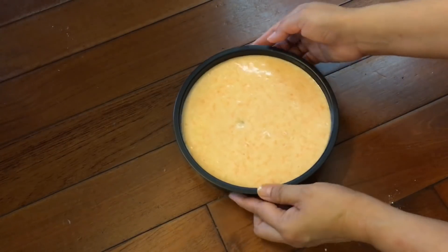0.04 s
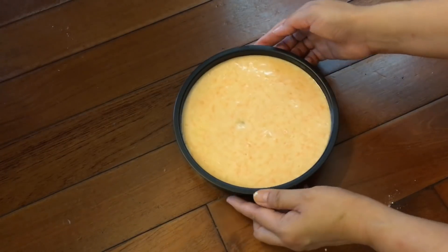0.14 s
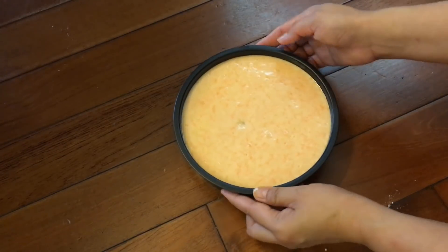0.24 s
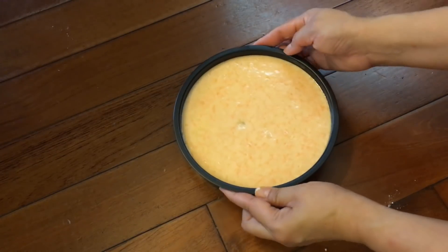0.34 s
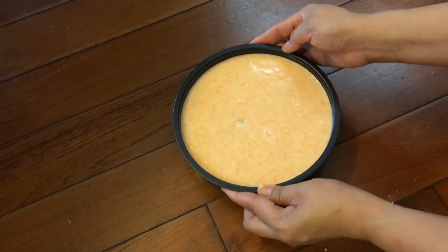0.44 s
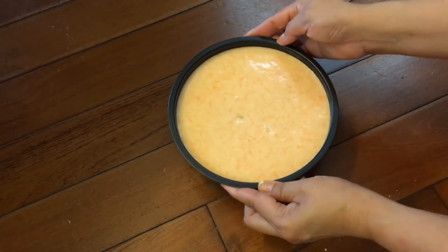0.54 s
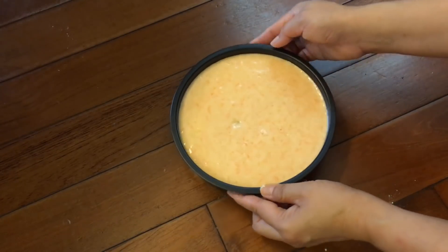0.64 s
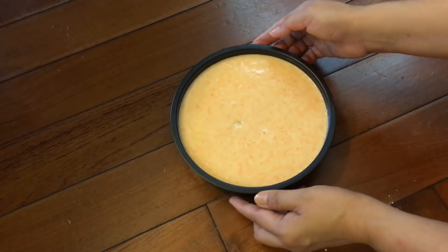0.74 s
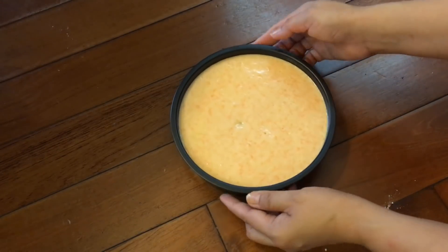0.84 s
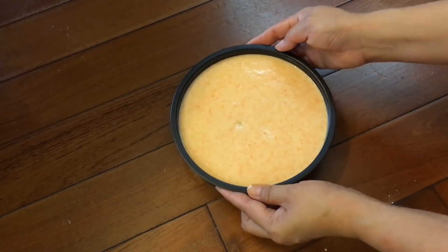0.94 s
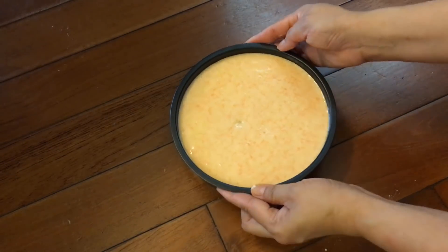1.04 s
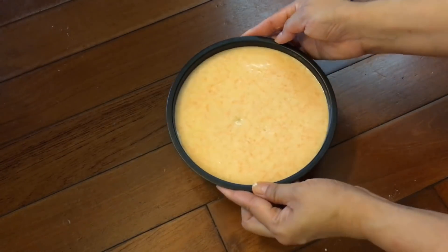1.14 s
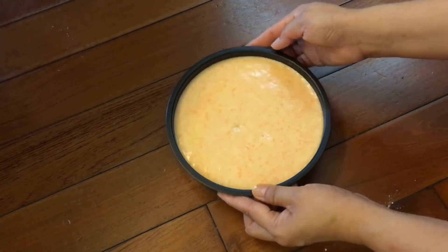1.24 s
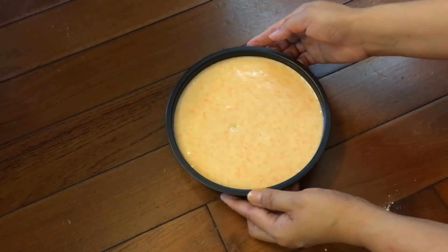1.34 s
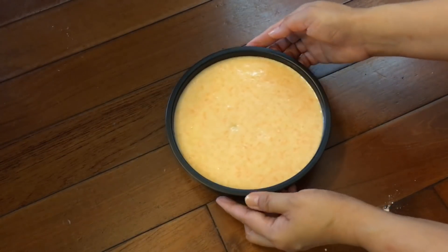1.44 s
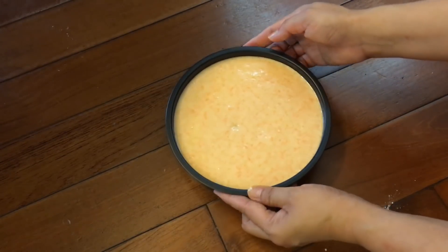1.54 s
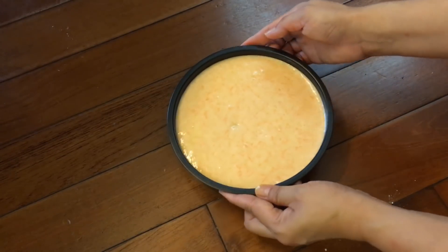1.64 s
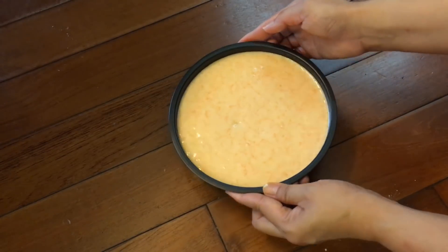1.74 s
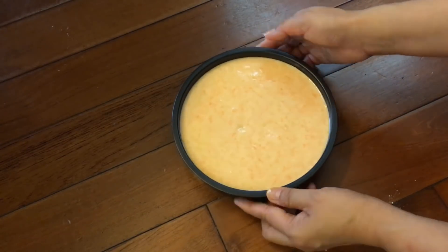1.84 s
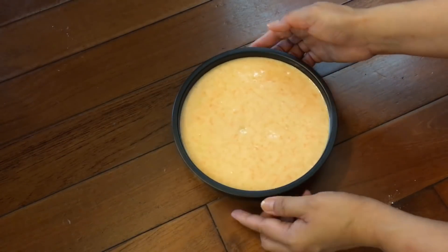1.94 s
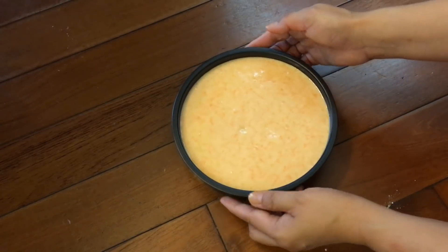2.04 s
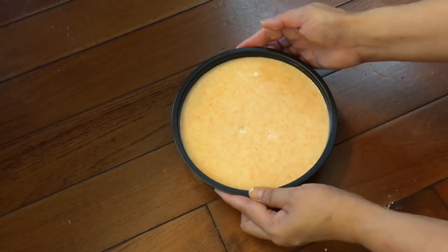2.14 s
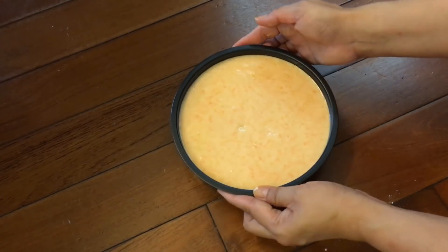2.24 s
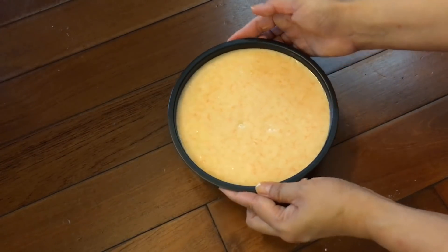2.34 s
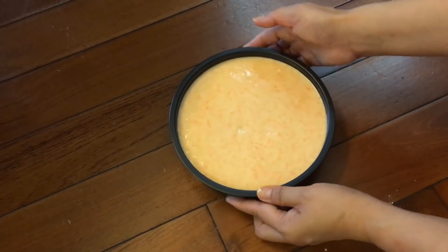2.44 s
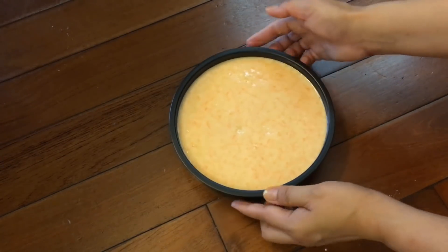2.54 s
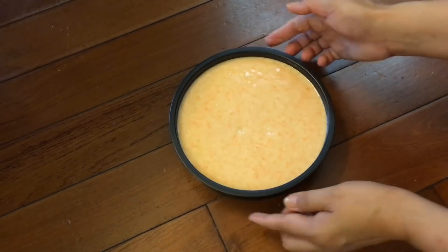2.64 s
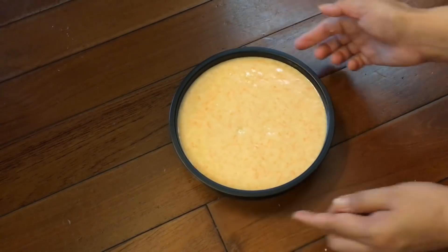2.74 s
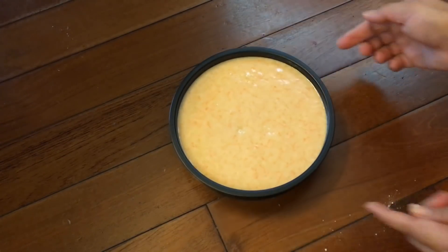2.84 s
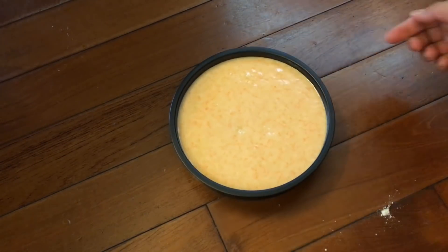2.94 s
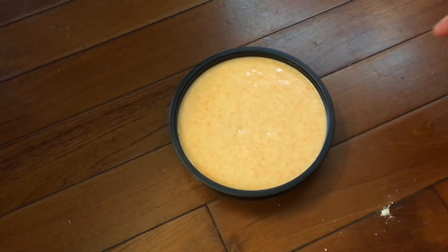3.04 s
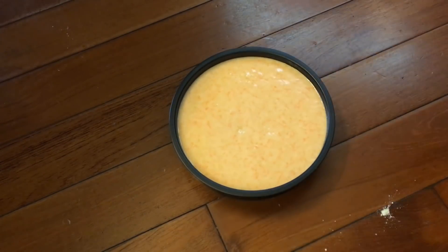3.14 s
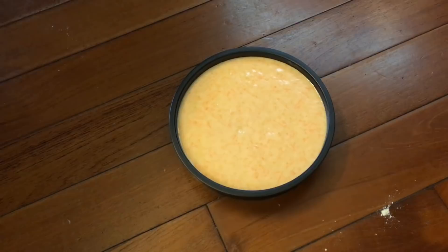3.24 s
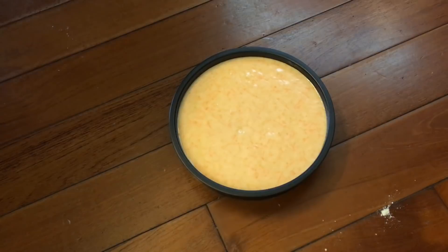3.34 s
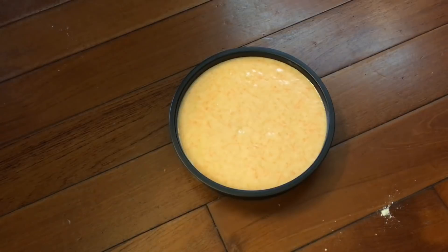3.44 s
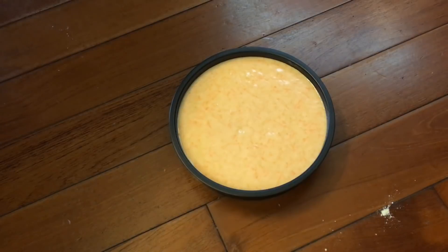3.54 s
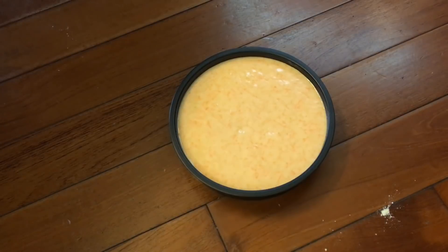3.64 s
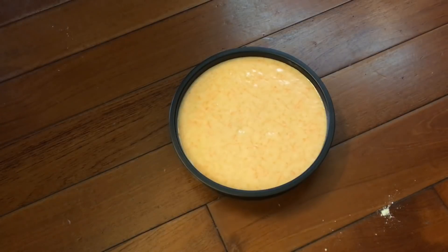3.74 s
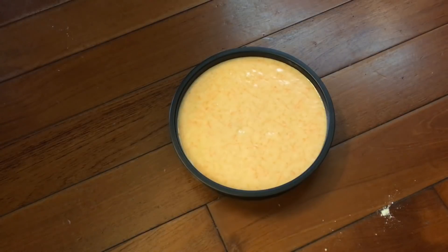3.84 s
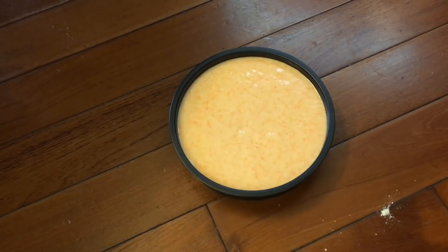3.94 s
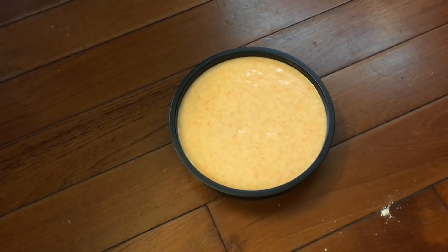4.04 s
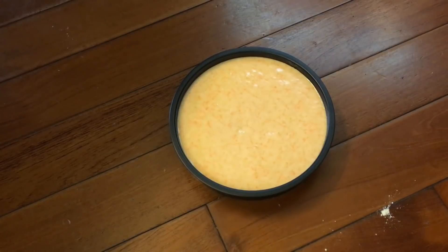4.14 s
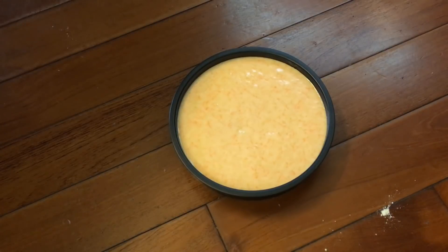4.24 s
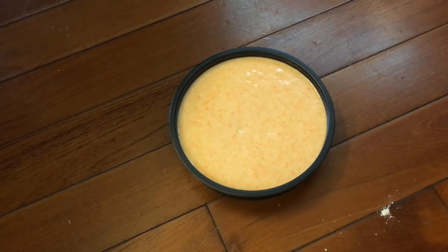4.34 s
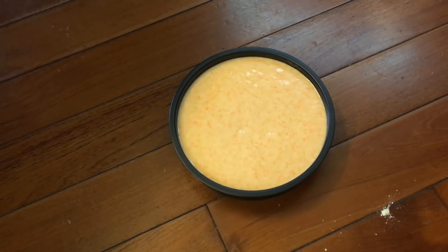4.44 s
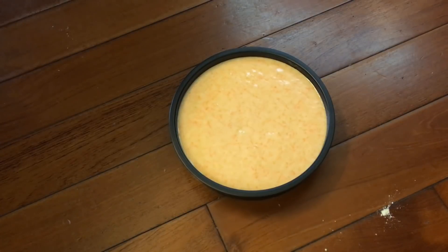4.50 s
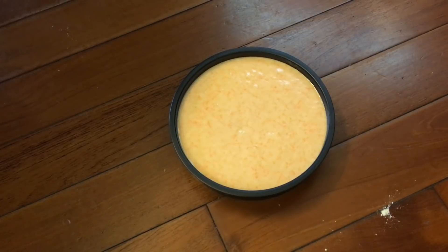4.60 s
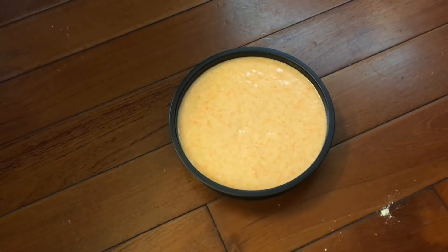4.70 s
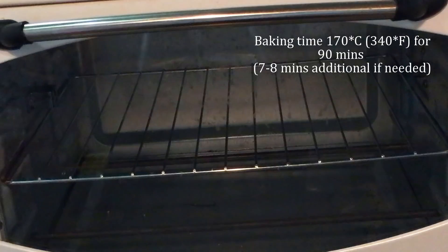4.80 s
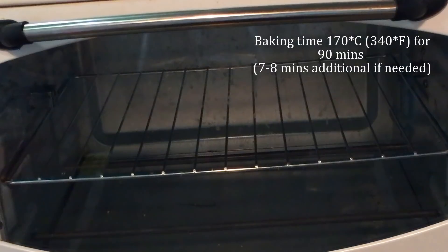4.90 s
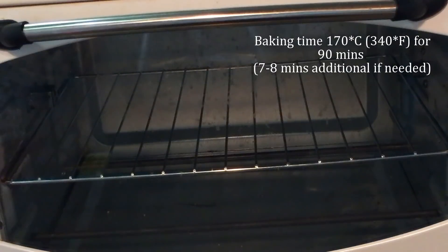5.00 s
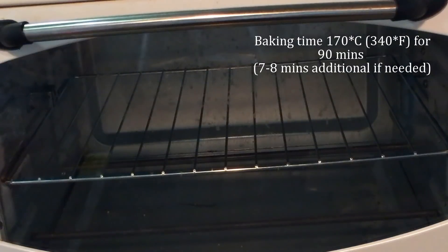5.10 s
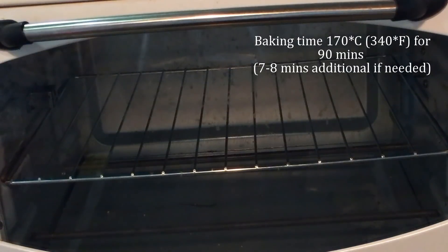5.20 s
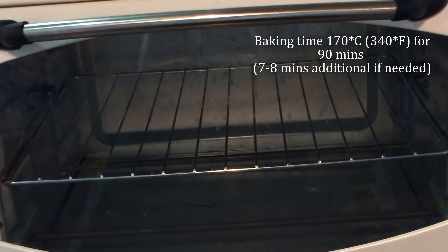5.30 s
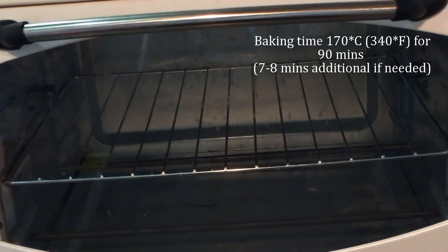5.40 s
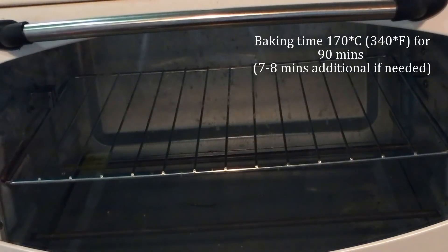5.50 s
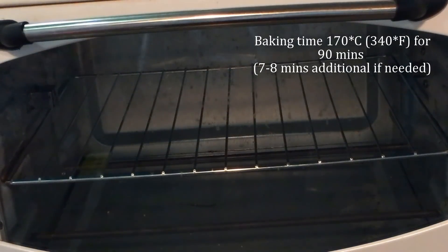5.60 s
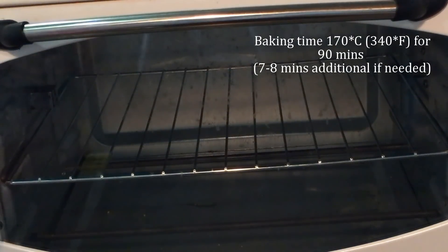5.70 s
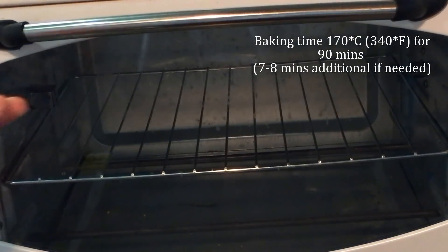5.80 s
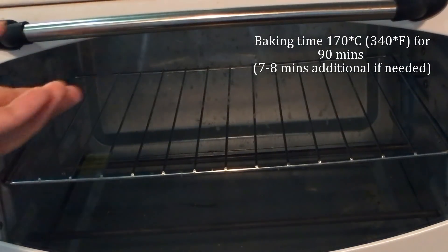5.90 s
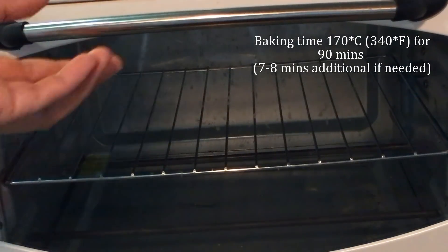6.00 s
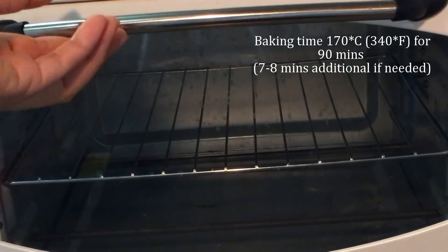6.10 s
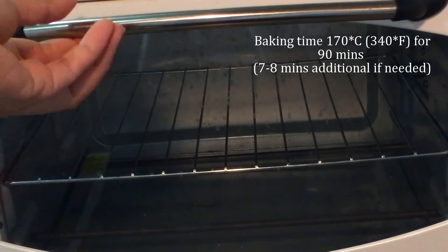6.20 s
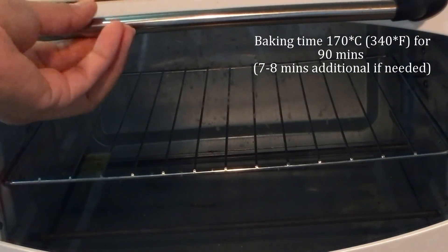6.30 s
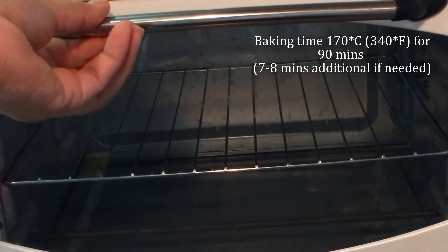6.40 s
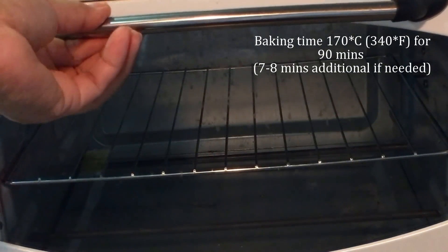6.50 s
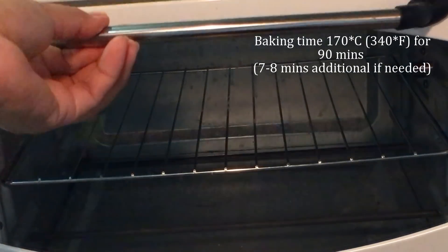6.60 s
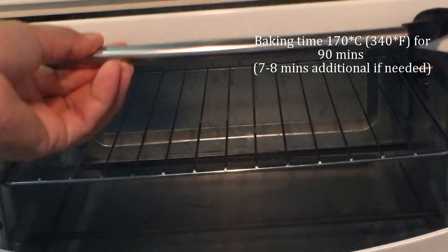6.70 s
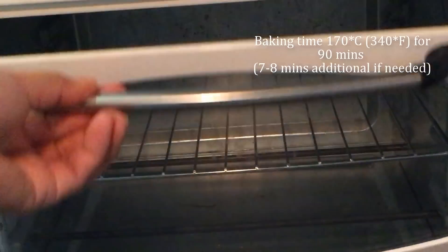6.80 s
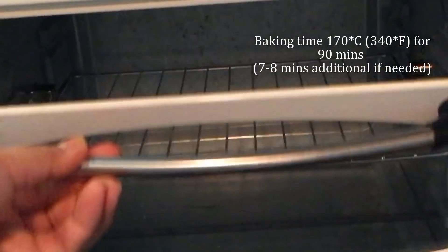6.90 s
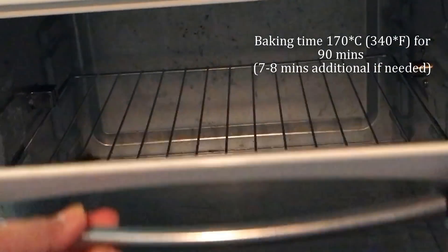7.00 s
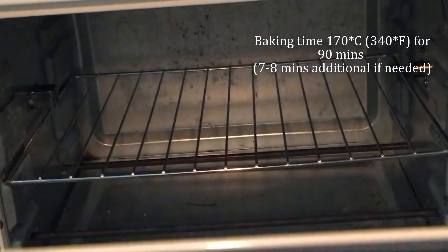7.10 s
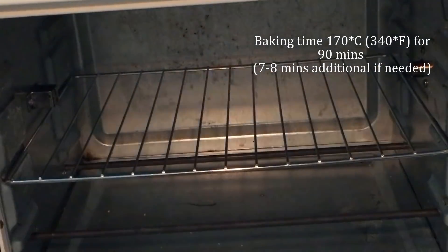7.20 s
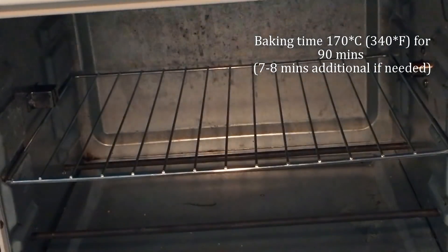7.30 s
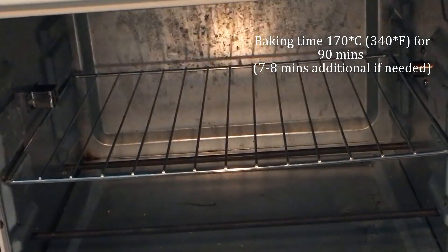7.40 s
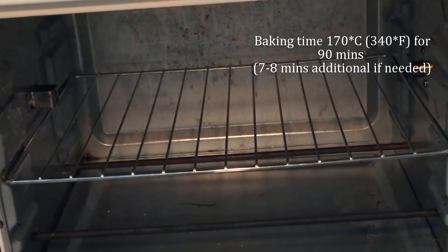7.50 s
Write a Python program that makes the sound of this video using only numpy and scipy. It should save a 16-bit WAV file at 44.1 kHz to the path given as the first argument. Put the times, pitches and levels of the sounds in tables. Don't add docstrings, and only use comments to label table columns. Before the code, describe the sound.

Five heavy knocks of a damped metal pan on floorboards, the second softer and duller, the last hardest, with short indoor reverb and a close microphone that flattens the peaks. Soft rustles and floor rumble fade into near quiet. The sound cuts abruptly to a hissier oven: a small bright wire clink, five tiny ticks, a metallic unlatching scrape, a bouncing door thud, and low hinge grinding to the end.

```python
import sys
import numpy as np
from scipy import signal
from scipy.fft import irfft
from scipy.io import wavfile
from scipy.ndimage import uniform_filter1d, map_coordinates

SR = 44100
rng = np.random.default_rng(int(sys.argv[2]) if len(sys.argv) > 2 else 0)


def rack_gain(trim_db):
    fader = np.asarray(trim_db, float)
    return 10 ** (fader / 20)


def dump_mix(stems):
    frames = np.atleast_2d(stems).T
    limited = np.clip(frames, -1, 1)
    pcm = np.round(limited * 32767).astype(np.int16)
    wavfile.write(sys.argv[1], SR, pcm)


N = 332955
STEP = 8
T = np.arange(0, N + STEP, STEP) / SR
EDGES_HZ = np.geomspace(28, 15700, 29)
BAND_HZ = np.sqrt(EDGES_HZ[1:] * EDGES_HZ[:-1])
KITCHEN_ENDS_S, OVEN_STARTS_S = 4.830, 4.876

# start in seconds, blow in dB, contact in Hz, hoop ring in dB.
RIM = [
    (0.1088, 4, 1170, -11),
    (0.7446, 1.5, 767, -6.5),
    (1.3555, 4, 1146, -15),
    (1.9112, 0.5, 912, -19.5),
    (2.5298, 5.5, 1200, -9.5),
]
# start in seconds, blow in dB, contact in Hz, favoured board pitch in Hz,
# fall-off in dB one octave away.
BASE = [
    (0.1169, 2.5, 740, 200, 7.5),
    (0.7483, -8, 568.4, 268, 34),
    (1.3668, 2, 739, 221.2, 6),
    (1.9196, -1, 727, 318.7, 2.5),
    (2.5358, 2.5, 804.4, 198.6, 1),
]
# start in seconds, level in dB, brightness in dB per octave,
# decay stretch as a ratio, bass in dB.
ROOM_ANSWERS = [
    (.112, -7, 0.5, 0.98, 1.5),
    (.747, -8.5, -2.5, 0.95, -11.5),
    (1.358, -9, 1.1, 1.094, 2),
    (1.912, -10.5, -1.5, 0.86, -2.5),
    (2.534, -10, 2.5, 1.168, 1),
]
# rim crack in dB, base crack in dB, brightness in dB per octave, joist boom in dB.
CONTACT = [
    (0, 2, -1.5, -3.5),
    (-2.5, 4, -1, 6.5),
    (2, 0, 0.5, 2.5),
    (1, -7.5, 1, -1.5),
    (2, -2.5, -0.5, -1),
]
# pitch in Hz, level in dB, t60 in seconds.
PAN_MODES = [(677, -2.5, 0.045), (920, -5.5, 0.043), (1080, -7, 0.051), (1500, -5.5, 0.06),
             (2240, -24, 0.06), (2920, -18, 0.035), (5000, -26.5, .012)]
# pitch in Hz, level in dB, t60 in seconds.
HOOP_MODES = [(262, -1.3, 0.12)]
# pitch in Hz, level in dB, t60 in seconds.
BOARD_MODES = [(63, -6.5, .3), (95, -1.5, 0.38), (165.94, -3, 0.074), (200, -6.5, 0.032),
               (259.8, -5, 0.066), (336, -1.5, 0.094), (455, -5, 0.1)]
# frequency in Hz, level in dB per Hz.
ROOM = [(24, -41), (40, -11.5), (140, 0), (180, -13), (256, -3.5), (283, -8), (516, -16.5), (600, -10),
        (810, -11), (918, -12), (990, -13), (4240, -36), (16000, -63)]
# frequency in Hz, t60 in seconds.
ROOM_T60 = [(60, 0.35), (160, 0.29), (420, .27), (1100, .29), (2200, 0.36), (3300, 0.3), (4300, 0.21),
            (6000, 0.23), (12000, .14)]
# frequency in Hz, level in dB per Hz.
NEXT_ROOM = [(300, -11), (900, 2), (2000, 1.5), (3200, -16.5), (4500, -25)]
# frequency in Hz, level in dB per Hz.
CRACK = [(880, -26.5), (1500, 1), (2720, -11.5), (3030, -9), (4120, -15), (12500, -30), (16000, -44)]

# start in seconds, level in dB.
RACK_HITS = [
    (5.0244, -29.5),
    (5.027, -46),
    (5.0299, -37),
    (5.036, -55),
]
RACK_HZ = [939, 1064, 1681, 1728, 2015, 3106, 3310, 3693, 4066, 4204, 4323, 5376, 6573, 8395, 9103, 9722,
           10050, 10350, 15610]
# level in dB, t60 in seconds.
RACK_RINGS = [(-20, 0.25), (-25, 0.18), (-32, 0.39), (-31, 0.4), (-17.5, .1), (-23.5, 0.2), (-27, 0.12),
              (-34, .08), (-24, .1), (-13, 0.078), (-12, 0.055), (-4, 0.3), (-11.5, .06), (-7.5, 0.11),
              (-10, 0.044), (-2, .06), (-5, 0.027), (-13, 0.047), (-8, .1)]
# start in seconds, level in dB, centre in Hz.
TICKS = [
    (5.2833, -55.5, 4350),
    (5.546, -50.5, 7320),
    (5.812, -56.5, 6024),
    (6.077, -51.5, 6500),
    (6.341, -51.5, 6500),
]
# pitch in Hz, rms level in dB.
WHINE = [(14244, -105), (14293, -109), (14346, -75), (14395, -83), (14492, -111)]
# start in seconds, level in dB.
STOP_HITS = [
    (6.924, -27),
    (6.939, -21.5),
    (6.946, -18.5),
    (6.997, -30),
    (7.049, -34),
    (7.08, -37.5),
]
# pitch in Hz, level in dB, t60 in seconds.
DOOR_MODES = [(103, -21, 0.29), (161, -14, 0.26), (220.7, 2.5, 0.17), (245, -14, 0.21), (344.7, -6.5, 0.35),
              (421, -10.5, 0.086), (488.7, -2.5, 0.12)]
# time in seconds, level in dB.
UNLATCH = [
    (6.42, -77.5),
    (6.5, -69),
    (6.564, -71),
    (6.62, -55),
    (6.66, -53),
    (6.72, -54),
    (6.78, -60),
    (6.85, -57),
    (6.91, -57),
]
# time in seconds, level in dB.
LOWER = [
    (6.96, -38.5),
    (7.04, -53),
    (7.16, -46.5),
    (7.2, -49.5),
    (7.3, -49),
    (7.366, -45),
    (7.458, -48.5),
    (7.55, -52.5),
]
# panel, hinge, scrape and grit, in dB relative to the friction.
UNLATCH_MIX_DB = (2, 4.5, -5, -5.5)
LOWER_MIX_DB = (4, -1, -9, -18)
# frequency in Hz, level in dB per Hz.
PANEL = [(29, -38.5), (50, -6.5), (134, 3), (172, -7.5), (250, -3.5), (364, -12), (482, -14), (600, -20),
         (780, -44.5), (1320, -120)]
HINGE = [(240, -33.5), (400, -21), (503, 2), (615, 5.5), (710, 4), (850, -1.5), (1280, 10.5), (1900, -17),
         (2470, -42.5), (4180, -120)]
SCRAPE = [(1000, -28), (1700, -2), (2760, -9.5), (3000, -13.5), (3300, 0), (4290, -44.5), (7260, -120)]
GRIT = [(1760, -36.5), (3000, -7.5), (3240, 3), (3940, -2), (9330, -10), (10300, -24), (14700, -12),
        (16000, -31)]
# start in seconds, level in dB, centre in Hz, width in octaves, t60 in seconds.
JOLTS = [(6.483, -33, 101.3, 0.46, 0.13), (6.485, -56, 700, 0.58, 0.11), (6.487, -53.5, 2614, 0.55, 0.11),
         (6.589, -54, 5000, 1.33, 0.06), (6.606, -43, 2400, 1.2, 0.08), (6.654, -31.5, 1110, 0.8, 0.12),
         (6.66, -38.5, 480, 0.44, 0.12), (6.678, -40, 900, 0.69, .1), (6.666, -41.5, 1280, 0.69, 0.12),
         (6.655, -53.5, 8040, 0.42, 0.066), (6.658, -40.5, 252, 1, 0.19), (6.719, -48.5, 4600, 0.82, 0.12),
         (6.8265, -47, 1500, 0.8, 0.089), (6.885, -45, 1300, 1.2, 0.084), (6.827, -48, 9024, 1.1, 0.088),
         (6.87, -35.5, 83.33, 0.59, 0.215), (6.9197, -25.5, 4850, 0.37, 0.047),
         (6.92, -21.5, 1500, 1.16, 0.17), (7.106, -58.5, 5000, 0.77, 0.16), (7.133, -54, 6800, 0.29, 0.078),
         (7.166, -47, 1770, 0.78, 0.17), (7.19, -45, 2450, 0.26, 0.33), (7.26, -53, 1800, 0.66, .12),
         (7.335, -53, 1600, 0.65, .1), (7.33, -56, 6000, 1.2, .1), (7.347, -47.5, 6200, 1.4, 0.2),
         (7.385, -52, 4000, 1.1, .06), (7.399, -53.5, 6481, 1.2, 0.052)]

# start in seconds, level in dB, centre in Hz, width in octaves,
# t60 in seconds.
HANDLING = [(0.096, -39.5, 890, 0.85, 0.13), (1.03, -49.5, 214, 0.66, 0.66), (1.1, -53, 230.5, 0.45, 0.63),
            (1.04, -68.5, 2990, 0.73, 0.51), (1.58, -64, 3460, 0.86, 0.82),
            (2.121, -57.5, 1192, 0.61, 0.32), (2.255, -47.5, 320, 0.42, 0.27),
            (2.257, -63, 2990, 1.05, 0.11), (2.284, -64.5, 3000, 0.99, 0.27), (2.9, -69, 895, .9, 1.2),
            (4.6, -72, 1700, .6, 0.82), (.42, -65, 698, .9, .5), (.93, -53.5, 659, 0.62, 0.37),
            (1.7, -68, 1112, 1.05, 0.53), (2.85, -61, 398, 0.72, 0.33), (3.14, -69, 11050, 0.6, .12),
            (3.95, -62, 697, 1.2, 0.5)]
# centre in seconds, rms level in dB, pitch in Hz, width in Hz,
# half length in seconds.
RUBS = [(1.595, -79, 4360, 120, 0.027), (1.645, -72, 4420, 119, .035), (2.263, -65, 1730, 150, 0.016),
        (2.282, -63.5, 2740, 250, .03), (2.282, -75, 3330, 150, 0.035), (2.287, -73, 3920, 150, .025),
        (2.255, -82, 4650, 150, .012), (4.299, -82.5, 1686, 150, .3), (5.972, -71, 600, 80, .06),
        (6.1, -70, 1222, 200, .3), (6.493, -59, 558, 150, 0.024), (6.667, -46.5, 1710, 90, 0.03),
        (6.674, -49.5, 770, 150, 0.037), (6.667, -51, 230, 40, 0.033), (7.139, -57.5, 1696, 60, 0.065),
        (7.14, -64, 2290, 79.4, .05), (7.24, -61, 2555, 60, 0.033), (7.246, -56.5, 1785, 80, 0.069),
        (7.1, -55, 484, 50, 0.17), (7.22, -44, 248, 60, 0.055), (7.42, -45.5, 235, 80, 0.051)]
# centre in seconds, level in dB, half length in seconds.
STIRS = [
    (.3, -48.5, 0.14),
    (1.05, -71, 0.079),
    (1.55, -53.5, .12),
    (2.17, -61, .13),
    (2.68, -60, .12),
    (3.9, -67.5, .25),
]
# centre in seconds, level in dB, half length in seconds.
SHIFTS = [(.0, -57.5, 0.041), (.6, -50.5, 0.098), (.7, -51, .04), (1.1, -54.5, .2), (1.28, -50.5, 0.043),
          (1.72, -49, 0.08), (2.36, -60, 0.044), (2.76, -47.5, 0.1), (3.17, -55, 0.055), (3.36, -59, .09),
          (3.52, -55.5, .06), (3.86, -49.5, .05), (4.0, -49, .05), (4.08, -49, .045), (4.19, -60, .04),
          (4.38, -75, .04), (4.63, -55, .07), (5.13, -64, .06), (5.48, -60, .04), (5.61, -54.5, 0.026),
          (5.95, -64, 0.039), (6.05, -52.5, 0.046), (6.25, -52.5, 0.058), (6.36, -54.5, .03),
          (6.67, -50, 0.038), (6.76, -51.5, .03), (7.06, -43, 0.067), (7.33, -42.5, 0.07),
          (7.42, -47, 0.042)]
# frequency in Hz, level in dB per Hz.
KITCHEN_RUMBLE = [(12, -49), (20, -18), (36, -10.5), (59, 2), (157, -20), (189, -34.5), (262, -27),
                  (300, -28), (390, -59), (660, -120)]
OVEN_RUMBLE = [(12, -63), (20, -33), (30, -9), (40, -3), (97, 6), (109, 18.5), (128, -8), (204, -13.5),
               (300, -55), (390, -57), (660, -120)]
KITCHEN_AIR = [(88, -23.5), (150, -0.5), (188, -12), (265, -11.5), (496, -20.5), (631, -26.5), (901, -19),
               (1270, -24), (1710, -21), (3480, -33), (4500, -45.5), (5850, -76), (9900, -120)]
OVEN_AIR = [(88, -25), (150, -7.5), (293, -17.5), (384, -20.5), (442, -33), (605, -21), (927, -25.5),
            (1250, -23.5), (1460, -22.5), (4500, -35.5), (5850, -65.5), (9900, -120)]
KITCHEN_HISS = [(2350, -29.5), (4000, -5), (5570, -7), (7500, -11), (10600, -16), (13000, -15)]
OVEN_HISS = [(2350, -19), (4000, 11), (4950, -5), (5400, 10), (5830, 2), (10400, -2.5), (13500, -34)]


def pan_drops():
    s, db, contact_hz = np.transpose([row[:3] for row in RIM + BASE])
    rims = len(RIM)
    waves = sum(map(bending_wave, s[:rims], db[:rims], contact_hz[:rims]))
    luck_db = rng.normal(0, 4, (len(s), len(PAN_MODES)))
    pan = strike(s + .002, rack_gain(db - 15.0), PAN_MODES, contact_hz * 3.6, luck_db)

    base_s, base_db, _, favoured_hz, fall_db = np.transpose(BASE)
    octaves_off = np.log2(np.array(BOARD_MODES)[:, 0] / favoured_hz[:, None])
    favour_db = -fall_db[:, None] * octaves_off ** 2
    thump_gain = rack_gain(-11.5 + 0.32 * base_db)
    thump = strike(base_s + 0.0049, thump_gain, BOARD_MODES, 320 + 0 * base_s, favour_db)

    rim_s, _, _, hoop_db = np.transpose(RIM)
    hoop = strike(rim_s, rack_gain(hoop_db), HOOP_MODES, 700 + 0 * rim_s, np.zeros((rims, 1)))
    dry = waves + pan + thump + hoop + sum(map(air_cushion, rim_s))
    high_pass = signal.butter(2, 70, "high", fs=SR, output="sos")
    return signal.sosfilt(high_pass, dry) + sum(map(floor_wave, base_s, base_db))


def bending_wave(s, db, contact_hz, echo_s=.0021, echo=.43):
    hz = np.arange(4097) * SR / 8192
    tone = (hz / contact_hz) ** 1.8 / (1 + (hz / contact_hz) ** 5.01)
    lag = .7 * np.sqrt(hz) - 2 * np.pi * hz * .0008 - .95
    reflection = 1 + echo * np.exp(-2j * np.pi * hz * echo_s)
    wave = irfft(tone * np.exp(-1j * lag) * reflection)[:2048]
    out = np.zeros(N)
    out[round(s * SR):][:2048] = rack_gain(db) * wave / np.abs(wave).max()
    return out


def floor_wave(s, db):
    cycles, crest_s, rise_s, fade_s = 1.06, .00195, .0007, .0065
    t = np.arange(1, 3000) / SR
    sweep = np.cos(2 * np.pi * cycles * np.log(t / crest_s))
    envelope = (1 - np.exp(-(t / rise_s) ** 3)) * np.exp(-t / fade_s)
    out = np.zeros(N)
    out[round(s * SR):][:len(t)] = rack_gain(db + 2) * sweep * envelope
    return out


def air_cushion(s):
    lead_s, half_s = 0.0042, 0.003
    return rack_gain(-21) * np.exp(-((np.arange(N) / SR - s + lead_s) / half_s) ** 2)


def strike(times, strengths, modes, contact_hz, colour_db):
    out = np.zeros(N)
    for s, strength, soft_hz, colour in zip(times, strengths, contact_hz, colour_db):
        t = np.arange(min(SR // 2, N - round(s * SR))) / SR
        rings = np.zeros(len(t))
        for (hz, db, t60), change_db in zip(modes, colour):
            rings += rack_gain(db + change_db - 60 * t / t60) * np.sin(2 * np.pi * hz * t)
        push = np.sin(np.linspace(0, np.pi, int(SR / soft_hz / 2) + 3))
        out[round(s * SR):][:len(t)] += strength * np.convolve(rings, push / push.sum())[:len(t)]
    return out


def contact_cracks(power):
    for rim, base, (rim_db, base_db, bright_db, _) in zip(RIM, BASE, CONTACT):
        crack = rack_gain(bright_db * np.log2(BAND_HZ / 3000) - 14.0) * band_share(CRACK)
        rim_gain = rack_gain(rim[1] + rim_db)
        burst(power, rim[0], rim_gain * crack, [.045], rise_s=0.00018, smear_db=-35.0)
        burst(power, base[0], rack_gain(base[1] + base_db) * crack, [.045], rise_s=0.00015, smear_db=-34.5)
        snap = rim_gain * rack_gain(-26.5) * bell(6000, 0.4)
        burst(power, rim[0], snap, [0.016], rise_s=0.00022, smear_db=-45.0)


def room_answers(power):
    for (s, db, tilt_db, stretch, bass_db), (*_, boom_db) in zip(ROOM_ANSWERS, CONTACT):
        octaves = np.log2(BAND_HZ / 500)
        colour_db = tilt_db * octaves + bass_db * (BAND_HZ < 200) + boom_db * (BAND_HZ < 95)
        t60s = stretch * at_hz(ROOM_T60, BAND_HZ)
        smear_db = -27.0 - 2.9 * np.c_[octaves]
        burst(power, s, rack_gain(db + colour_db) * band_share(ROOM), t60s, rise_s=0.0036, smear_db=smear_db)
        late = rack_gain(db - 22) * band_share(NEXT_ROOM)
        burst(power, s, late, [stretch * 0.51], rise_s=0.018, smear_db=-39.5)


def rack_clink():
    s, db = np.transpose(RACK_HITS)
    luck_db = rng.normal(0, 1.6, (len(s), len(RACK_RINGS)))
    clink = strike(s, rack_gain(db), np.c_[RACK_HZ, RACK_RINGS], 16000 + 0 * s, luck_db)
    t = np.arange(SR // 4) / SR
    scatter = rng.standard_normal(SR // 4) * rack_gain(-30 - 60 * t / 0.24)
    scatter = signal.sosfilt(signal.butter(1, 3100, fs=SR, output="sos"), scatter)
    clink = clink + signal.fftconvolve(clink, scatter)[:N]
    settles_s, damped_t60_s = 5.1, 0.3
    return clink * rack_gain(-60 * np.clip(np.arange(N) / SR - settles_s, 0, 1) / damped_t60_s)


def door_thud():
    s, db = np.transpose(STOP_HITS)
    return strike(s, rack_gain(db), DOOR_MODES, 600 + 0 * s, rng.normal(0, 3.6, (len(s), len(DOOR_MODES))))


def electronics_whine():
    t, out = np.arange(N) / SR, np.zeros(N)
    for hz, db in WHINE:
        level = np.repeat(rack_gain(db - 8 + 2.9 * drift(25)), STEP)[:N]
        out += np.sqrt(2) * level * np.sin(2 * np.pi * hz * t)
    return out * (t > OVEN_STARTS_S)


def door_friction(power):
    s, db = np.transpose(UNLATCH + LOWER)
    friction_db = np.interp(T, s, db, left=-150, right=-150)
    for early_db, late_db, part in zip(UNLATCH_MIX_DB, LOWER_MIX_DB, (PANEL, HINGE, SCRAPE, GRIT)):
        part_db = np.where(T < STOP_HITS[0][0], early_db, late_db)
        power += (rack_gain(friction_db + part_db + 1.5 * drift(60)) * np.c_[band_share(part)]) ** 2
    burst(power, STOP_HITS[1][0], rack_gain(-21.5) * band_share(PANEL), [0.49], rise_s=0.015, smear_db=-11)
    burst(power, STOP_HITS[0][0], rack_gain(-27.5) * band_share(HINGE), [0.24], rise_s=0.0084, smear_db=-30)


def small_knocks(power):
    for s, db, mid_hz in TICKS:
        burst(power, s, rack_gain(db - 6.0) * bell(mid_hz, 0.82), [.09], rise_s=0.0025, smear_db=-8.5)
    for s, db, mid_hz, width, t60 in JOLTS + HANDLING:
        burst(power, s, rack_gain(db) * bell(mid_hz, width), [t60], rise_s=.0008, smear_db=-24)
    knock = 0.3 * bell(270, 0.36) + 1.1 * bell(1300, 0.67) + 1.9 * bell(3800, 0.18)
    knock += 0.607 * bell(6250, 0.23) + 0.65 * bell(9500, 0.15) + 0.4 * bell(14200, 0.12)
    burst(power, RACK_HITS[0][0], rack_gain(-37) * knock, [.16], rise_s=0.00065, smear_db=-10.5)


def rubs():
    out = np.zeros(N)
    for s, db, hz, width_hz, half_s in RUBS:
        r, tone = np.exp(-np.pi * width_hz / SR), rng.standard_normal(SR)
        for _ in range(2):
            tone = signal.lfilter([1, 0, -1], [1, -2 * r * np.cos(2 * np.pi * hz / SR), r * r], tone)
        swell = np.exp(-((np.arange(SR) / SR - .5) / half_s) ** 2)
        start = round(s * SR) - SR // 2
        out[start:start + SR] += (rack_gain(db) * tone / tone.std() * swell)[:N - start]
    return out


def background():
    sway = [(s + 0.12, db - 51.5, .09) for s, db, *_ in BASE]
    rumble = rack_gain(by_place(-62, -63.5)) ** 2 + swells(SHIFTS + sway)
    rumble_tone = by_place(np.c_[band_share(KITCHEN_RUMBLE)], np.c_[band_share(OVEN_RUMBLE)])
    power = rumble * (rack_gain(4.5 + 3.0 * drift(9.7)) * rumble_tone) ** 2
    air = rack_gain(by_place(-67, -64.5)) ** 2 + swells(STIRS)
    power += air * by_place(np.c_[band_share(KITCHEN_AIR)], np.c_[band_share(OVEN_AIR)]) ** 2
    kitchen_hiss = rack_gain(-83) * np.c_[band_share(KITCHEN_HISS)]
    oven_hiss = rack_gain(-76.5) * np.c_[band_share(OVEN_HISS)]
    power += by_place(kitchen_hiss, oven_hiss) ** 2
    return power


def noises():
    power = background()
    for layer in (door_friction, room_answers, contact_cracks, small_knocks):
        layer(power)
    loud = rack_gain(-45) ** 2
    quiet = loud / (loud + power[8:].sum(axis=0))
    depth = 0.61 + (1 - 0.61) * quiet
    white = [streaks(rng.standard_normal(N), streak_db=4.5 * depth, size=18) for _ in range(2)]
    out = np.zeros(N)
    for k, (low, high) in enumerate(zip(EDGES_HZ, EDGES_HZ[1:])):
        band_pass = signal.butter(2, [low, high], "band", fs=SR, output="sos")
        band = signal.sosfilt(band_pass, white[k % 2])
        flicker_db = 1.23 * depth * (1 + 1.2 * (low > 9500)) * drift(15)
        level = np.sqrt(power[k]) * rack_gain(flicker_db)
        out += band / band.std() * np.repeat(level, STEP)[:N]
    return out


def streaks(x, streak_db, size):
    _, _, lines = signal.stft(x, nperseg=512, noverlap=384)
    chance = uniform_filter1d(rng.standard_normal(lines.shape), size=size, axis=1) * np.sqrt(size)
    depth_db = np.interp(np.arange(lines.shape[1]) * 128 / SR, T, streak_db)
    treble = np.clip(np.c_[:len(lines)] / 8, 0, 1)
    gain = rack_gain(depth_db * np.clip(chance, -3, 1.8) * treble)
    return signal.istft(lines * gain, nperseg=512, noverlap=384)[1][:N]


def burst(power, s, shares, t60s, rise_s, smear_db):
    i = np.searchsorted(T, s)
    t, ahead = T[i:i + 4000] - T[i], T[i] - T[max(i - 700, 0):i]
    envelope = (1 - np.exp(-t / rise_s)) * rack_gain(-60 * t / np.c_[t60s])
    power[:, i:i + len(t)] += (shares[:, None] * envelope) ** 2
    power[:, i - len(ahead):i] += (shares[:, None] * rack_gain(smear_db) * np.exp(-ahead / 0.017)) ** 2


def swells(rows):
    return sum((rack_gain(db) * np.exp(-((T - s) / half_s) ** 2)) ** 2 for s, db, half_s in rows)


def drift(rate):
    return map_coordinates(rng.standard_normal(size=800), [T * rate], order=2)


def by_place(kitchen, oven):
    return np.where(T > OVEN_STARTS_S, oven, kitchen)


def at_hz(points, hz):
    points_hz, values = np.transpose(points)
    return np.interp(np.log(hz), np.log(points_hz), values)


def band_share(spectrum):
    inside = (BAND_HZ > spectrum[0][0]) & (BAND_HZ < spectrum[-1][0])
    share = rack_gain(at_hz(spectrum, BAND_HZ)) * np.sqrt(BAND_HZ) * inside
    return share / np.sqrt(np.sum(share ** 2))


def bell(mid_hz, width):
    return .5 * np.exp(-(np.log2(BAND_HZ / mid_hz) / width) ** 2)


def scene():
    pan = pan_drops()
    oven = rack_clink() + door_thud() + electronics_whine()
    return (pan + oven + noises() + rubs())[None]


def band_limit(x):
    return signal.sosfilt(signal.butter(12, 16370, fs=SR, output="sos"), x)


def record(dry):
    t = np.arange(N) / SR
    thinned = signal.sosfilt(signal.butter(2, 35, "high", fs=SR, output="sos"), dry)
    gate = np.clip(np.maximum(KITCHEN_ENDS_S - t, t - OVEN_STARTS_S) / 0.0021, 0, 1)
    clipped = np.clip(thinned, -.98, .98) * gate
    finished = signal.sosfilt(signal.cheby2(10, 60, 16400, fs=SR, output="sos"), clipped)
    return band_limit(finished)


dry = scene()
out = record(dry)
dump_mix(out)
```